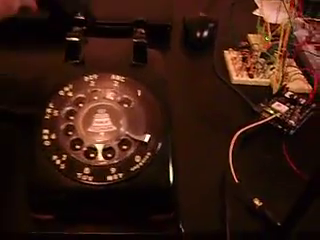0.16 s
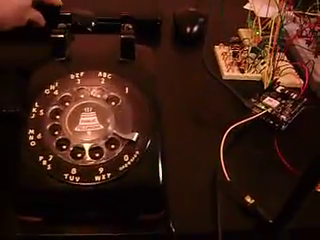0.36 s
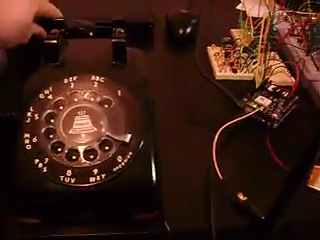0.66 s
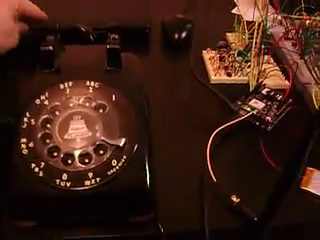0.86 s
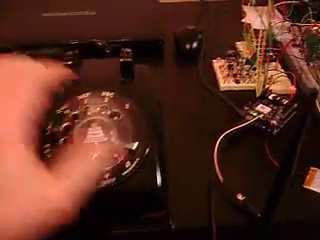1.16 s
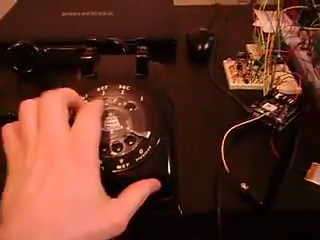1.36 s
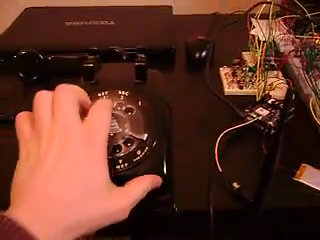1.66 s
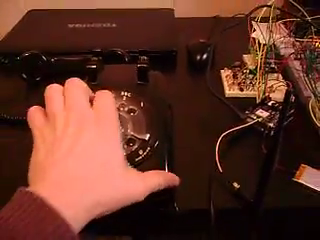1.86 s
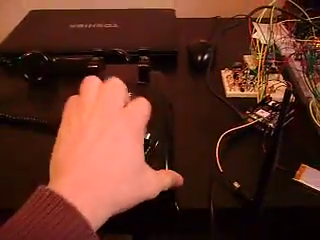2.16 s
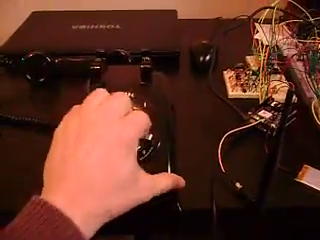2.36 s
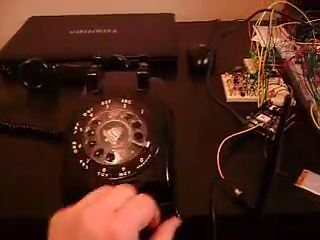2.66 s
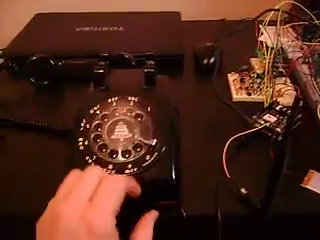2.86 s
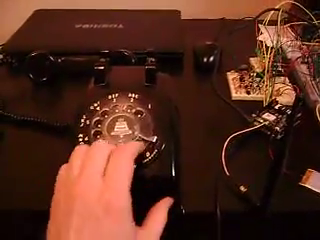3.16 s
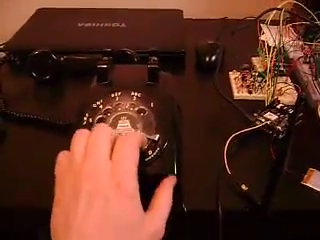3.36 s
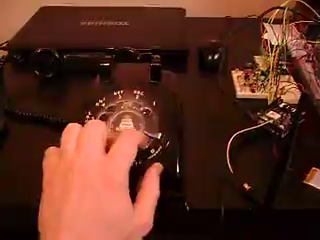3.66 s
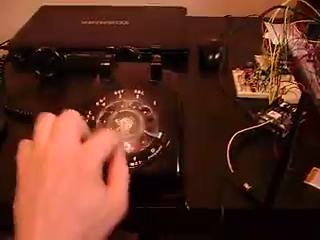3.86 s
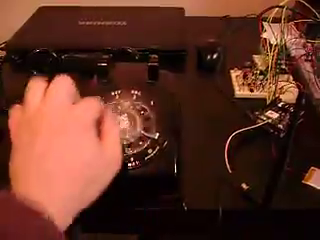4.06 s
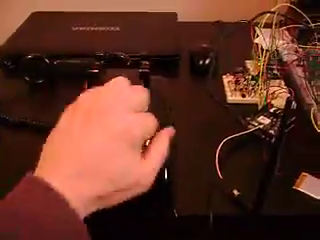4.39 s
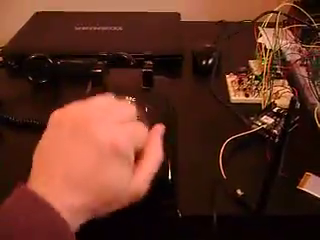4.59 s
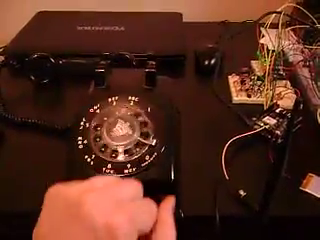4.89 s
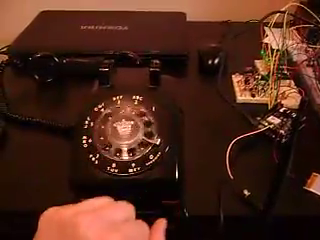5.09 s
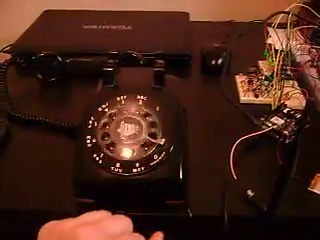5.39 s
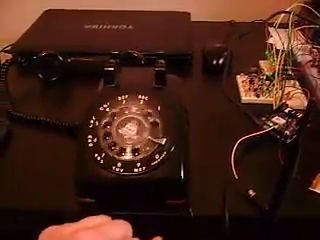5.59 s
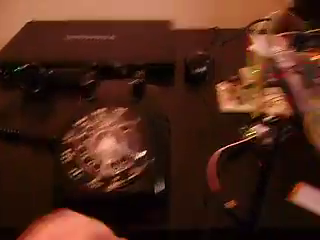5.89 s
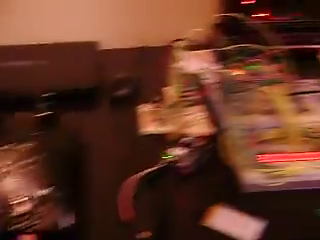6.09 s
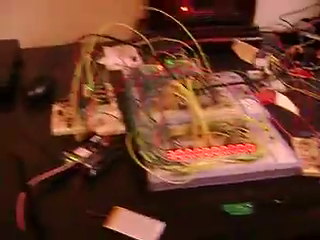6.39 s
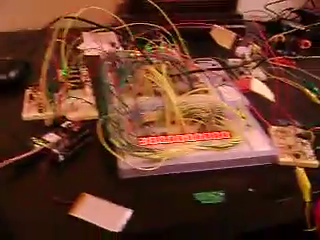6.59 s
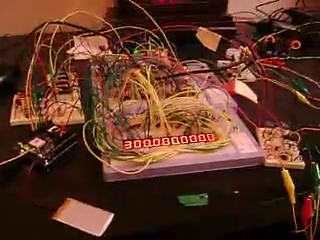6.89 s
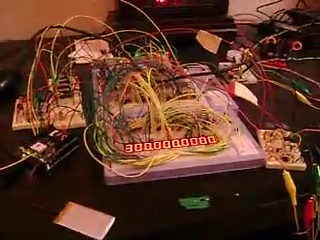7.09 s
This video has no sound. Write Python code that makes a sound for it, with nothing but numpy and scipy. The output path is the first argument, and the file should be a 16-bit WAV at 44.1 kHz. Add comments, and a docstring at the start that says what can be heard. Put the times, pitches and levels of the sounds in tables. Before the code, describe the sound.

A telephone handset thumps down loudly on a wooden desk, distorting, then a rotary dial is wound and ratchets back twice over fan hum.

```python
"""A light knock over a fan's hum; then a telephone handset is lifted off its cradle and dropped on a wooden
desk, overloading a small microphone. The rotary dial is wound and let go twice: gears rattle in the housing
and the dial knocks on its stops. Blows and dense random contacts ring resonant modes, with noise for cracks
and scrapes; wavering tones and steady noise make the computer fan. All is heard in a small room."""
import sys
import numpy as np
from scipy import signal
from scipy.fft import rfft, irfft, next_fast_len
from scipy.io import wavfile

SR = 44100
rng = np.random.default_rng(int(sys.argv[2]) if len(sys.argv) > 2 else 0)


def transcribe(u):
    """Save the signal u as a 16-bit wav file named by the first command-line argument.

    u: samples, shape (n,) or (channels, n), limited to [-1, 1]; the rate is SR.
    q: integer samples, one column per channel.
    """
    v = np.clip(np.atleast_2d(u).T, -1, 1)
    q = np.round(v * 32767).astype(np.int16)
    wavfile.write(sys.argv[1], SR, q)


def volts_from_decibels(level):
    """Turn decibel levels (scalar or array-like) into linear amplitude factors."""
    exponent = np.asarray(level, float) / 20
    return 10 ** exponent


N = 319284

# handset knocking on cradle and desk: t/s, blow level/dB, crack trim/dB, shell mode trim/dB (re blow)
HANDSET_THUDS = [(0.094, -44, -9, -8), (0.505, 0.5, -15, -9), (0.512, -1.5, -36, -14),
                 (0.542, -9, -7, -11.5), (0.547, -1.5, -26, -1), (0.571, -3.5, -11.5, -2.5),
                 (0.583, -2, -18.5, -9), (0.596, -2.5, -27, -19), (0.609, -5, -18.5, -6.5),
                 (0.634, -8.5, -29, -19.5), (0.669, -21.5, -16.5, -24), (0.767, -15, -15.5, -6.5),
                 (0.776, -9.5, -18, -14), (0.795, 13.5, -17.5, -15), (0.803, 5, -31.5, -11.5),
                 (0.81, -7, -6.5, -4.5), (0.821, 3, -22, -5), (0.83, 0.5, -23, -13),
                 (0.839, -0.5, -24, -22), (0.849, -3.5, -22, -15), (0.869, -10.5, -23, -20),
                 (0.919, -23.5, -15, -15), (1.388, -38, -7, -7)]
# finger, finger stop and rest stop knocking the dial, stray taps:
# t/s, blow level/dB, crack trim/dB, low mode trim/dB, bright mode trim/dB (re blow)
DIAL_KNOCKS = [(0.093, -29, -14, -27, -13), (1.385, -30, -12.5, 0, -6), (1.977, -44, -13, -13, -13),
               (2.09, -41, -12.5, 0, -18), (2.122, -35, -16, -10, -30), (2.142, -27.5, -15.5, -15, -31),
               (2.176, -29.5, -15.5, -16, -30), (2.262, -28, -11, -0.5, -12.5),
               (2.306, -34, -7.5, -10, -21), (2.483, -37, -22, -8, -12), (2.501, -16.5, -16, -10, -13.5),
               (2.734, -50, -1, -4, -18), (2.772, -37.5, -14, -5, -14), (2.891, -15.5, -11.5, -2, -6),
               (2.933, -34, -15, -17, -23), (3.286, -39, -17, 5, -12), (3.885, -36, -14, -7, -8),
               (3.925, -32.5, -21, -17, -16), (3.953, -35, -19, -13, -12), (4.034, -43.5, -10, -13, 2),
               (4.162, -33, -19, 2, -16), (4.252, -32, -21, -13, -21), (4.272, -35.5, -31, -27, -29),
               (4.298, -40, -18, -14, -16), (4.325, -38, -19, -13, -22), (4.364, -35.5, -15, -9.5, -17),
               (4.401, -34, -14, -16, -14), (4.433, -25.5, -11, -1, -19), (4.473, -51.5, -14, -10, -21),
               (4.639, -34, -18, -14, -14), (4.649, -35, -16, -12, -5.5), (5.761, -14.5, -13.5, -13, -5),
               (5.808, -36, -14, 3, -14), (7.133, -43.5, -4, 3, -18)]
# desk and handset modes: f/Hz, level/dB, t60/s
DESK_MODES = [(140, -33, 0.089), (304, -24.5, .12), (367.2, 0.5, 0.18), (411.7, 0.5, 0.12),
              (457.4, -7, 0.14), (486, -4, 0.2), (557, -12.5, 0.078), (600, -12, 0.18), (682.5, -10, 0.089),
              (834, -9, 0.036), (919, -11.5, 0.085), (968, -14, 0.061), (1015, -7.5, 0.06),
              (1127, -10.5, 0.11), (1189, -16.5, 0.091), (1320, -32, 0.15), (1600, -29, 0.046),
              (1980, -30, 0.075)]
# telephone housing and dial plate modes: f/Hz, level/dB, t60/s
HOUSING_MODES = [(150, 3, 0.1), (425, -6.5, 0.1), (497, -10.5, 0.14), (644, -1, 0.088), (708, -1.5, 0.05),
                 (862, -10.5, 0.028), (951, 4.5, 0.09), (1048, 2, 0.048), (1192, -4, 0.067),
                 (1650, -37, 0.017), (2175, -11.5, 0.032), (2624, -9, 0.042), (2965, -18.5, 0.062),
                 (3480, -20.5, 0.012), (4090, -11.5, .02), (5040, -7.5, 0.017)]
# crack and scrape spectrum: f/Hz, relative density/dB per Hz
CRACK_SPECTRUM = [(800, -8), (1400, -4.5), (2000, -3), (2700, -4), (3500, -4.5), (4500, -5.5), (5200, -4),
                  (7000, -8)]
# room noise spectrum: f/Hz, relative density/dB per Hz
AIR_SPECTRUM = [(20, -25), (45, -13), (85, -17.5), (120, -10), (200, -6), (300, -6), (450, -6.5), (580, -9),
                (690, -5), (1000, -10.5), (1250, -14), (1500, -18.5), (3000, -22), (4500, -23),
                (5600, -22.5), (8000, -25)]
# fan tones: multiple of turning rate, mid level/dB rms
FAN_TONES = [(1, -81), (2, -76.5), (4, -59), (5, -60.5), (7, -64), (8, -60), (20, -69), (43, -78.5)]
# hand shifting handset and cord: start t/s, end t/s, start level/dB, end level/dB
HANDSET_SHIFTS = [(0.0, .47, -83, -99), (.735, .795, -51, -55), (1.0, 1.37, -87, -98)]
# dial wound by the finger: start t/s, end t/s, start gear load/dB, end gear load/dB
DIAL_WINDS = [(2.09, 2.32, -41.5, -52), (3.87, 4.48, -48.5, -42)]
# dial running back to its rest stop: start t/s, end t/s, start gear load/dB, end gear load/dB
DIAL_RETURNS = [(2.449, 2.891, -48.5, -47.5), (4.607, 5.761, -48.5, -45.5)]
# contacts of one dial pulse, counted back from the rest stop:
# level re gear load/dB, crack trim/dB, low mode trim/dB, bright mode trim/dB
CAM_CONTACTS = [(7.3, -31, 8.5, -7), (5.2, -9, -13, -22.5), (6.6, -18.5, 0, -3), (0.1, -15, -6, -11)]

# handset; after each thud it keeps rocking and scraping
SHELL_MODES_OVER_HZ, THUD_CONTACT_S, HAND_DAMPED_SHARE = 780, 0.003, 0.57
ROCK_DB, ROCK_T60_S, SKID_DB, SKID_T60_S = -52, 0.27, -25, 0.33
SHIFT_SCRAPE_DB = 6.5

# dial
LOW_MODES_UNDER_HZ, PLATE_MODES_OVER_HZ, BASE_MODE_UNDER_HZ = 780, 1000, 300
BRIGHT_MODES_HZ = 2000, 3000
KNOCK_CONTACT_S, DIAL_CRACK_T60_S, DIAL_BUZZ_DB = 0.008106, 0.058, -11
SHAKE_DB, SHAKE_T60_S = -20.5, 0.28   # gears shaken loose by a knock
TURN_EDGE_S, FINGER_UNEVEN_DB = 0.027, 2.5
SLACK_DB_PER_S = 3   # low modes swell as the spring slackens
BASE_RATTLE_DB = -8.5
# low, middle, plate, scrape drive re gear load/dB
WINDING_DRIVE_DB, RETURN_DRIVE_DB = (-8.5, -1.5, 3, -1.5), (4, -1.3, -4.5, -2)
CONTACT_HZ, CAM_JITTER_S, CAM_SPREAD_DB, CAM_ENGAGES_S = 39.2, 0.00146, 3, 0.086
JOLT_DB, JOLT_HZ = -21.5, 71

# background, room, microphone
FAN_HZ, AIR_DB = 58.7, -48
ROOM_T60_S, ROOM_DB, WALL_CUT_HZ = 0.26, -20, 5500
BASS_CUT_HZ, MIC_CUT_HZ, MIC_STOP_HZ = 282, 5350, 6644
INPUT_TOP, OUTPUT_TOP = 0.682, 0.70   # full scale = 1


def handset():
    """A thud reaches the modes at scattered times during contact; the hand damps a share; clatter fills gaps."""
    times, peak_db, crack_db, shell_db = np.transpose(HANDSET_THUDS)
    shifting = strokes(HANDSET_SHIFTS, edge_s=0.036)
    delays_s = rng.random((len(times), len(DESK_MODES))) * THUD_CONTACT_S
    strength_db = rng.normal(0, 0.67, delays_s.shape)
    rocking = dying(times, np.minimum(peak_db, 0) + ROCK_DB, ROCK_T60_S)
    rattle = grains(per_s=580, spread_db=0.0) * (shifting + rocking)
    skidding = dying(times, peak_db + crack_db + SKID_DB, SKID_T60_S)
    scrape = volts_from_decibels(SHIFT_SCRAPE_DB) * shifting + skidding
    out = cracks(times, peak_db + crack_db + 4.0, t60_s=0.029, tail_db=-26)
    out += coloured(CRACK_SPECTRUM) * scrape * volts_from_decibels(3.6 * drift(60))
    for k, (hz, level_db, t60_s) in enumerate(DESK_MODES):
        blow_db = peak_db + strength_db[:, k] - 6.5
        if hz > SHELL_MODES_OVER_HZ:
            blow_db = blow_db + shell_db + 11.0
        blows = clicks(times + delays_s[:, k], blow_db)
        free = ring((1 - HAND_DAMPED_SHARE) * blows + rattle, hz, t60_s)
        damped = ring(HAND_DAMPED_SHARE * blows, hz, 0.39 * t60_s)
        out += volts_from_decibels(level_db) * (free + damped)
    return out


def dial():
    """Knocks and dense tooth contacts share the housing modes; sliding adds a scrape."""
    times, peak_db, crack_db, low_db, bright_db = np.hstack([np.transpose(DIAL_KNOCKS), cam()])
    winding = strokes(DIAL_WINDS, TURN_EDGE_S) * volts_from_decibels(FINGER_UNEVEN_DB * drift(40))
    shaken = dying(times, peak_db + SHAKE_DB, SHAKE_T60_S)
    returning = strokes(DIAL_RETURNS, TURN_EDGE_S) + shaken
    low_drive, middle_drive, plate_drive, scrape = [
        volts_from_decibels(wind_db) * winding + volts_from_decibels(return_db) * returning
        for wind_db, return_db in zip(WINDING_DRIVE_DB, RETURN_DRIVE_DB)]
    swell_db = SLACK_DB_PER_S * slack_s()
    teeth = [grains(per_s=600, spread_db=4.0) for gear in range(3)]
    delays_s = rng.random((len(times), len(HOUSING_MODES))) * KNOCK_CONTACT_S
    strength_db = rng.normal(0, 1.46, delays_s.shape)
    out = cracks(times, peak_db + crack_db + 5.5, DIAL_CRACK_T60_S, DIAL_BUZZ_DB)
    for k, (hz, level_db, t60_s) in enumerate(HOUSING_MODES):
        blow_db = peak_db + strength_db[:, k] - 6.5
        spread = 1
        if hz < LOW_MODES_UNDER_HZ:
            blow_db = blow_db + low_db
            base_db = BASE_RATTLE_DB if hz < BASE_MODE_UNDER_HZ else 0
            drive = low_drive * volts_from_decibels(swell_db + base_db)
        elif hz > 2 * LOW_MODES_UNDER_HZ:
            bright = BRIGHT_MODES_HZ[0] < hz < BRIGHT_MODES_HZ[1]
            blow_db = blow_db + (bright_db + 14.5 if bright else crack_db + 15)
            spread = 0.3   # the treble speaks first
            drive = scrape
        else:   # the finger's load shifts the rattle to the plate
            drive = plate_drive if hz > PLATE_MODES_OVER_HZ else middle_drive
        blows = clicks(times + delays_s[:, k] * spread, blow_db)
        rattle = teeth[k % 3] * drive * volts_from_decibels(-26.5)
        out += volts_from_decibels(level_db) * ring(blows + rattle, hz, t60_s)
    grit_db = 2 * drift(40)
    return out + coloured(CRACK_SPECTRUM) * scrape * volts_from_decibels(-2.5 + grit_db)


def slack_s():
    """Minus the time left in each return of the dial; 0 elsewhere."""
    t = np.arange(N) / SR
    return sum(np.interp(t, [start, end, end + TURN_EDGE_S], [start - end, 0, 0], 0, 0)
               for start, end, *_ in DIAL_RETURNS)


def cam():
    """Pulse contacts as the dial runs back: knock columns, near-regular, silent until the cam engages."""
    rows, back = [], np.arange(1, 45)
    for start, end, first_db, last_db in DIAL_RETURNS:
        chance = rng.standard_normal((len(back), 2))
        times = end - back / CONTACT_HZ + CAM_JITTER_S * chance[:, 0]
        contacts = np.array(CAM_CONTACTS)[(back - 1) % len(CAM_CONTACTS)]
        contact_db, crack_db, low_db, bright_db = contacts.T
        load_db = np.interp(times, [start, end], [first_db, last_db])
        peak_db = contact_db + load_db + CAM_SPREAD_DB * chance[:, 1]
        peak_db = np.where(times > start + CAM_ENGAGES_S, peak_db, -200)
        low_db = low_db - SLACK_DB_PER_S * (end - times)
        rows.append([times, peak_db, crack_db, low_db, bright_db])
    return np.hstack(rows)


def jolts():
    """Each tabled dial knock pushes the desk once: one deep, fast-dying mode."""
    times, peak_db, *_ = np.transpose(DIAL_KNOCKS)
    return ring(clicks(times, peak_db + JOLT_DB), JOLT_HZ, t60_s=0.043)


def fan():
    """Wavering tones at multiples of the turning rate over air noise."""
    phase = 2 * np.pi * np.cumsum(FAN_HZ * (1 + 0.00201 * drift(1.7))) / SR
    tones = 0
    for multiple, level_db in FAN_TONES:
        gain = np.sqrt(2) * volts_from_decibels(level_db + 2.24 * drift(3.6))
        tones = tones + gain * np.sin(multiple * phase + rng.uniform(0, 2 * np.pi))
    sway_db = 0.4 * drift(4)
    return tones + volts_from_decibels(AIR_DB + sway_db) * coloured(AIR_SPECTRUM)


def room(x):
    """Ten feedback delays, duller on every round."""
    size = next_fast_len(N + SR)
    turn = np.exp(-2j * np.pi * np.fft.rfftfreq(size))   # one-sample delay
    pole = np.exp(-2 * np.pi * WALL_CUT_HZ / SR)
    wall = (1 - pole) / (1 - pole * turn)
    response = 0
    for k, lag in enumerate((np.geomspace(0.009, 0.031, 10) * SR).astype(int)):
        loop = volts_from_decibels(-60 * lag / SR / ROOM_T60_S) * wall * turn ** lag
        response = response + (-1) ** k * loop / (1 - loop)
    return irfft(rfft(x, size) * response, size)[:N]


def cracks(times, levels_db, t60_s, tail_db):
    """Bright noise that starts at each blow and dies fast, with a weaker buzz after it."""
    sharp = dying(times, levels_db, t60_s)
    buzz = volts_from_decibels(tail_db) * dying(times, levels_db, 0.2)
    return coloured(CRACK_SPECTRUM) * (sharp + buzz)


def grains(per_s, spread_db):
    """Random contacts at a wavering rate about per_s, random sign, sizes spread by spread_db, rms 1."""
    sizes = volts_from_decibels(spread_db * np.minimum(rng.exponential(1, N), 4)) * rng.choice([-1, 1], N)
    hits = rng.random(N) < per_s * volts_from_decibels(3 * drift(15)) / SR
    return rms_one(sizes * hits)


def ring(force, hz, t60_s):
    """Two-pole resonator: a unit click sets a decaying sine of initial height 1 ringing."""
    r, w = volts_from_decibels(-60 / (t60_s * SR)), 2 * np.pi * hz / SR
    return signal.lfilter([0, np.sin(w)], [1, -2 * r * np.cos(w), r * r], force + 1e-18)


def clicks(times, levels_db):
    """One click for each time."""
    out = np.zeros(N)
    np.add.at(out, (np.asarray(times) * SR).astype(int), volts_from_decibels(levels_db))
    return out


def dying(times, levels_db, t60_s):
    """An envelope that jumps at each blow and dies away exponentially."""
    return signal.lfilter([1], [1, -volts_from_decibels(-60 / (t60_s * SR))], clicks(times, levels_db) + 1e-18)


def strokes(rows, edge_s):
    """Gain of movements whose level runs straight in dB, with soft ends."""
    t, gain = np.arange(N) / SR, 0
    for start, end, first_db, last_db in rows:
        edges = np.clip(np.minimum(t - start, end + edge_s - t) / edge_s, 0, 1)
        gain = gain + volts_from_decibels(np.interp(t, [start, end], [first_db, last_db])) * edges
    return gain


def coloured(spectrum):
    """Steady noise with the given spectrum, rms 1."""
    hz, level_db = np.transpose(spectrum)
    grid_hz = np.maximum(np.fft.rfftfreq(N, 1 / SR), 1)
    gain = volts_from_decibels(np.interp(np.log(grid_hz), np.log(hz), level_db))
    return rms_one(irfft(rfft(rng.standard_normal(N)) * gain, N))


def drift(rate_hz):
    """Slow random wander, rms 1: noise through two equal poles at rate_hz, made at SR / 40."""
    r = np.exp(-80 * np.pi * rate_hz / SR)
    noise = rng.standard_normal(N // 40 + 2002)
    slow = signal.lfilter([1], [1, -2 * r, r * r], noise)[2000:]   # skip the run-in
    return np.interp(np.arange(N) / 40, np.arange(len(slow)), rms_one(slow))


def rms_one(x):
    """Scale to rms 1."""
    return x / np.sqrt(np.mean(x ** 2) + 1e-20)


def scene():
    """Handset and dial, too small to radiate bass, in the room over desk jolts and fan."""
    bass_cut = signal.butter(2, BASS_CUT_HZ, "high", fs=SR, output="sos")
    near = signal.sosfilt(bass_cut, handset() + dial())
    return (near + volts_from_decibels(ROOM_DB) * room(near) + jolts() + fan())[None]


def band_limit(x):
    """A steep low-pass at the top of the band."""
    return signal.sosfilt(signal.butter(12, 16980, fs=SR, output="sos"), x)


def record(dry):
    """The input overloads, the top is cut steeply, and the filter's overshoot clips once more."""
    overloaded = np.clip(dry, -INPUT_TOP, INPUT_TOP)
    narrow = signal.sosfilt(signal.butter(8, MIC_CUT_HZ, fs=SR, output="sos"), overloaded)
    narrow = signal.sosfilt(signal.cheby2(10, 50, MIC_STOP_HZ, fs=SR, output="sos"), narrow)
    mix = np.clip(narrow, -OUTPUT_TOP, OUTPUT_TOP)
    return band_limit(mix)


dry = scene()
out = record(dry)
transcribe(out)
```